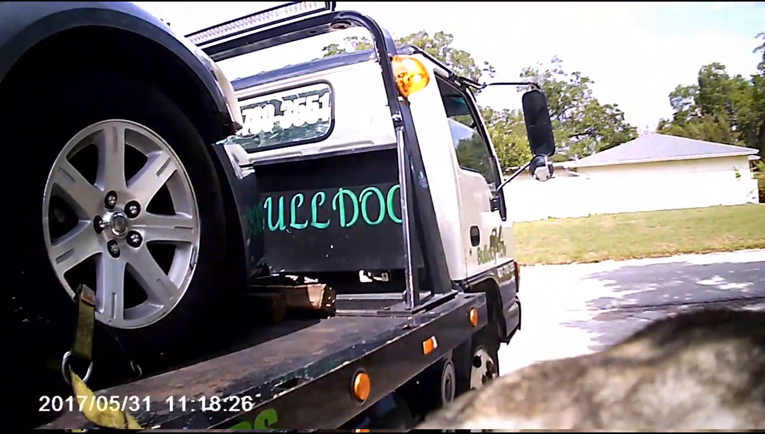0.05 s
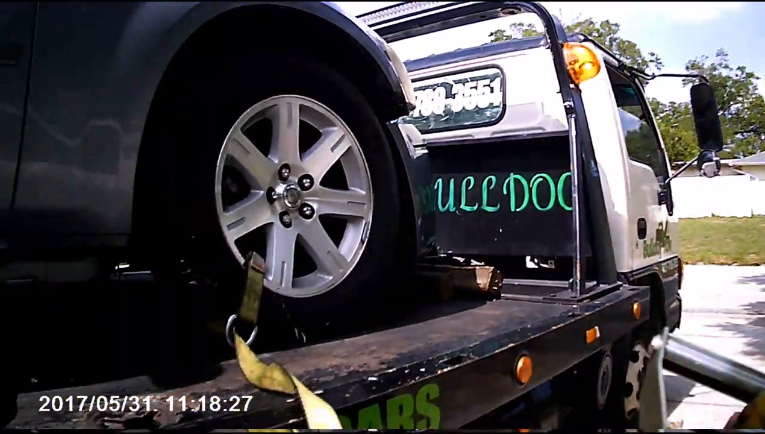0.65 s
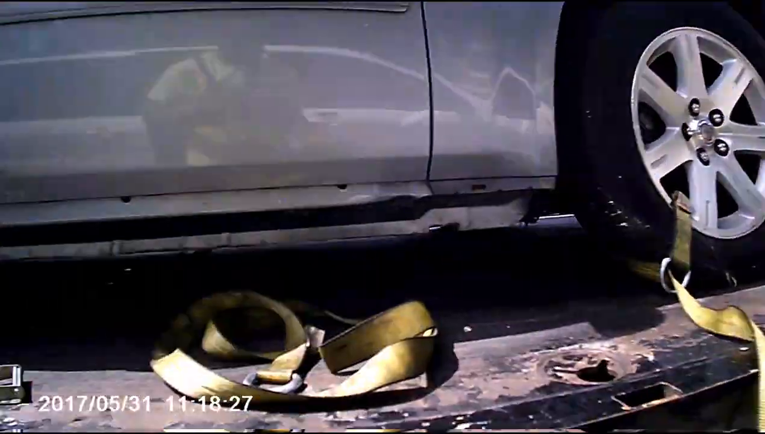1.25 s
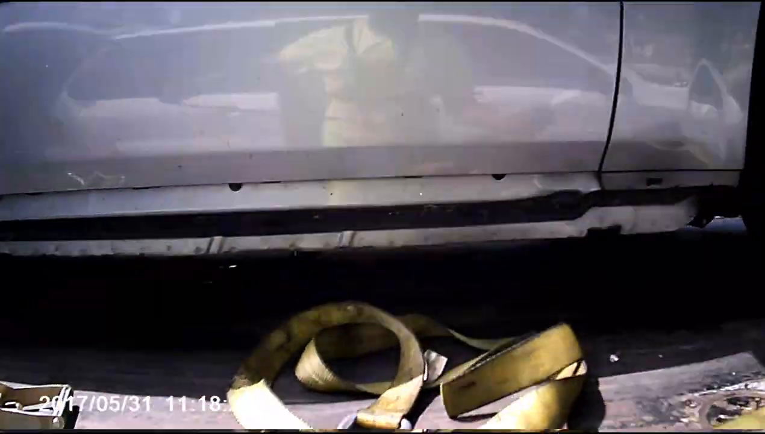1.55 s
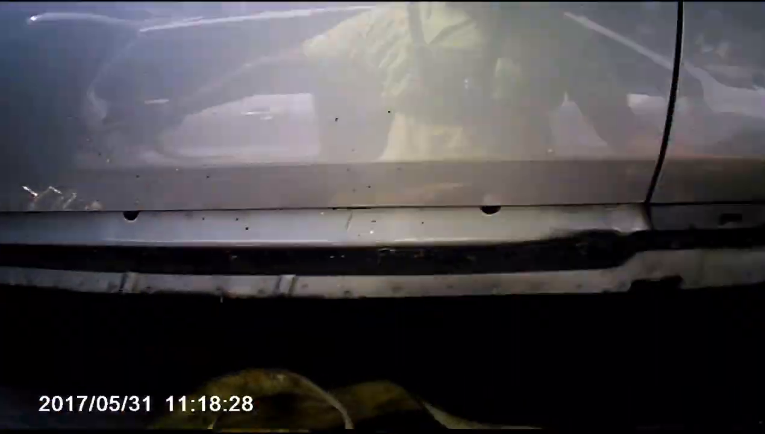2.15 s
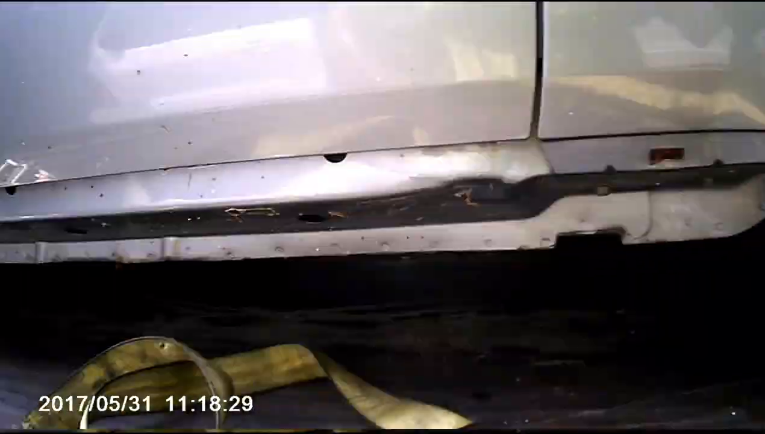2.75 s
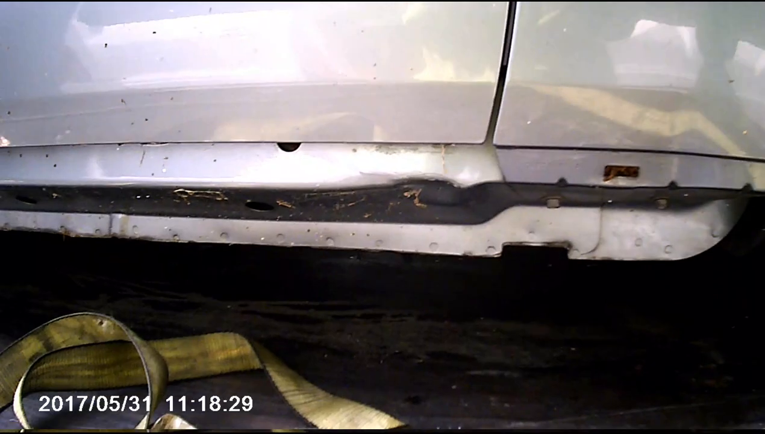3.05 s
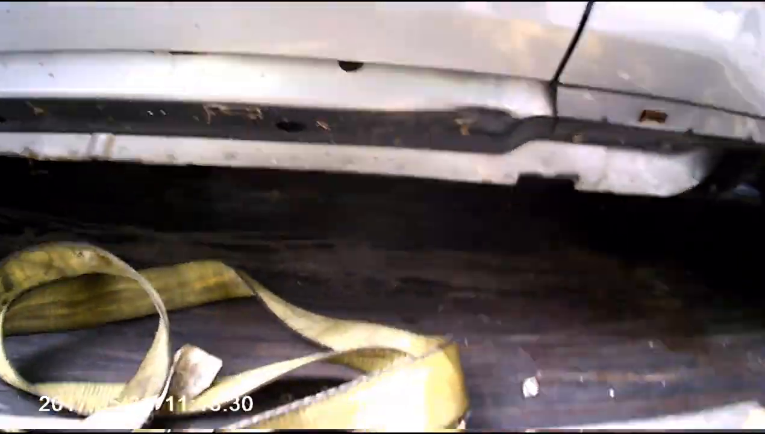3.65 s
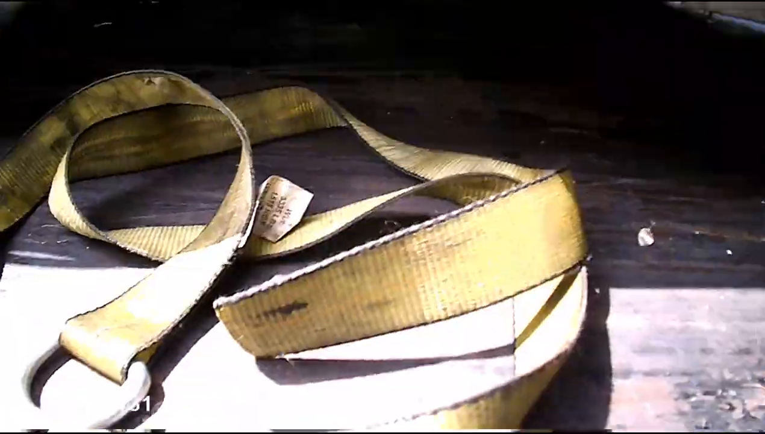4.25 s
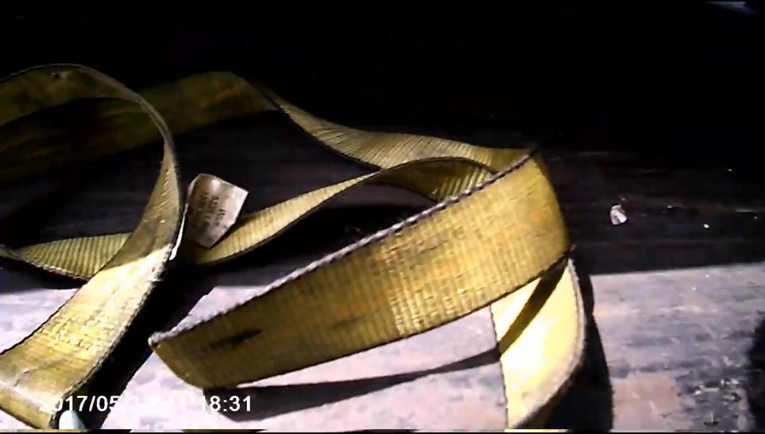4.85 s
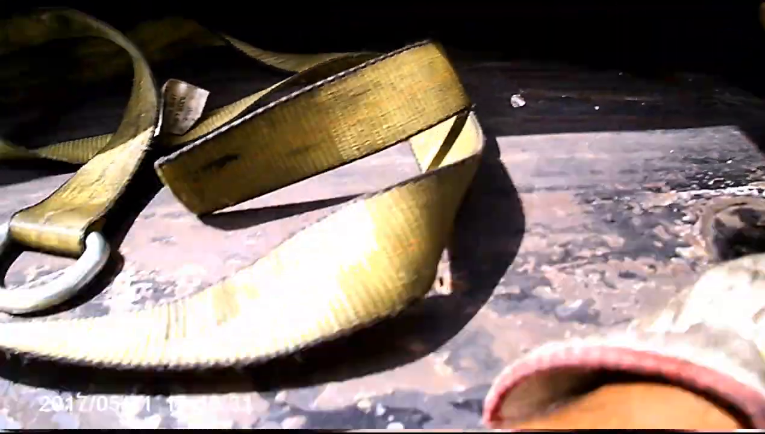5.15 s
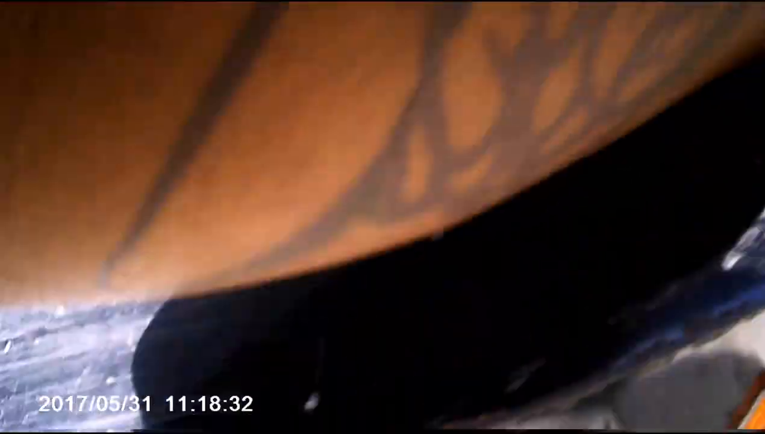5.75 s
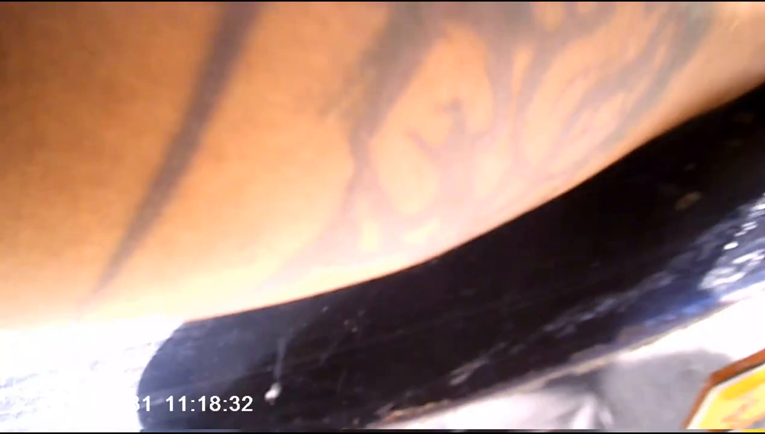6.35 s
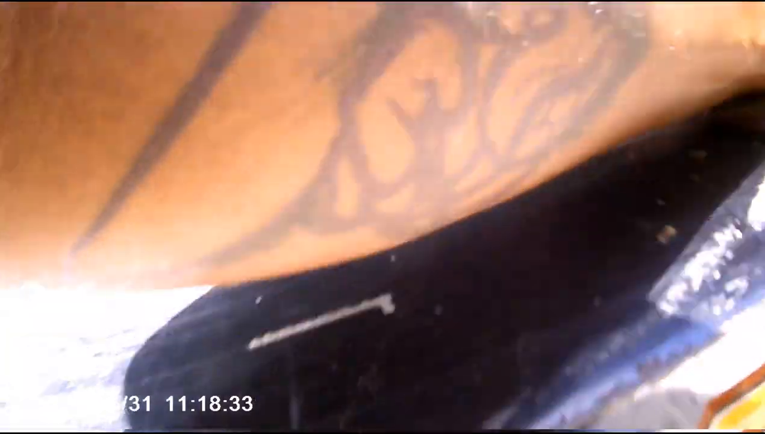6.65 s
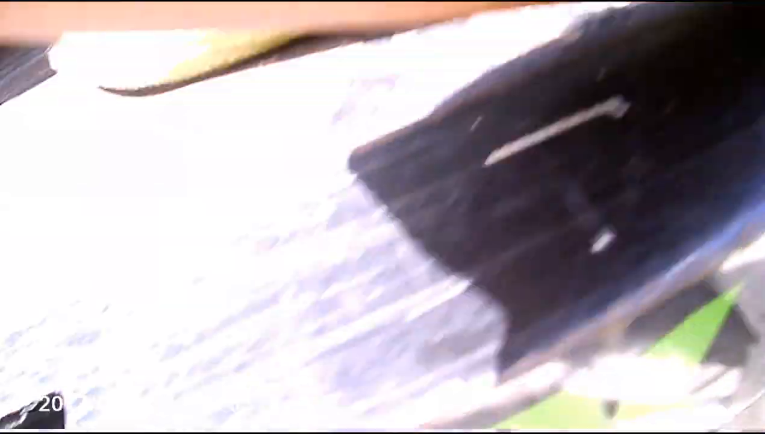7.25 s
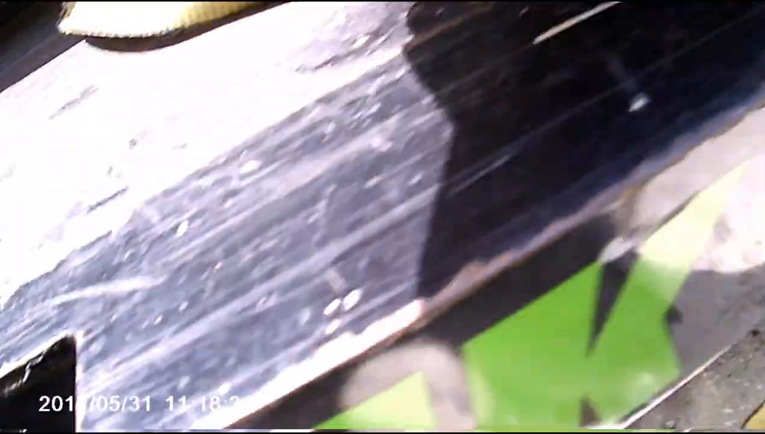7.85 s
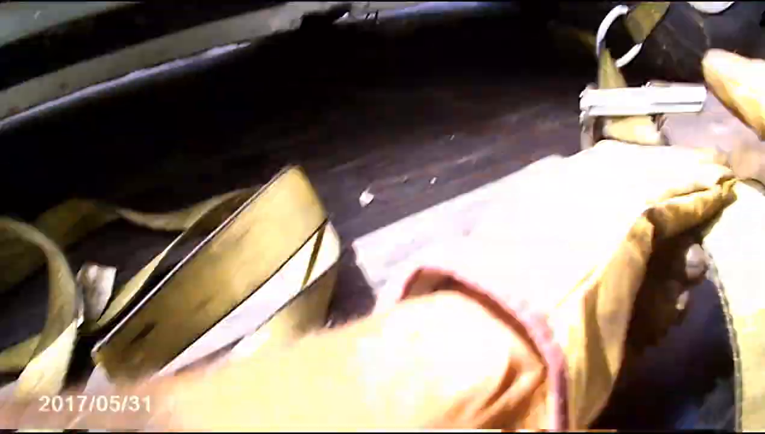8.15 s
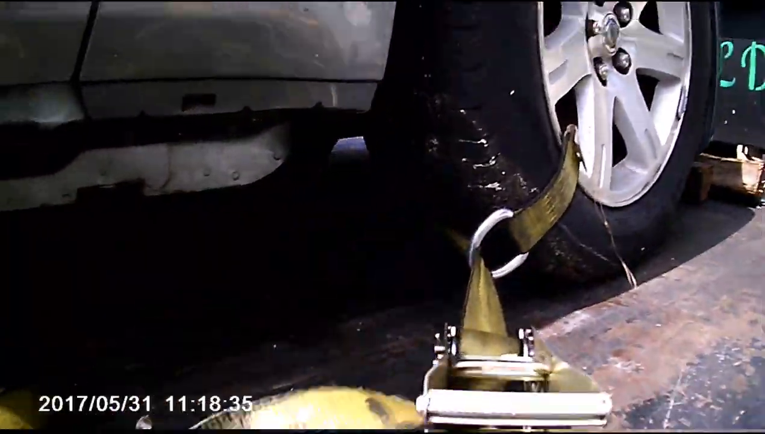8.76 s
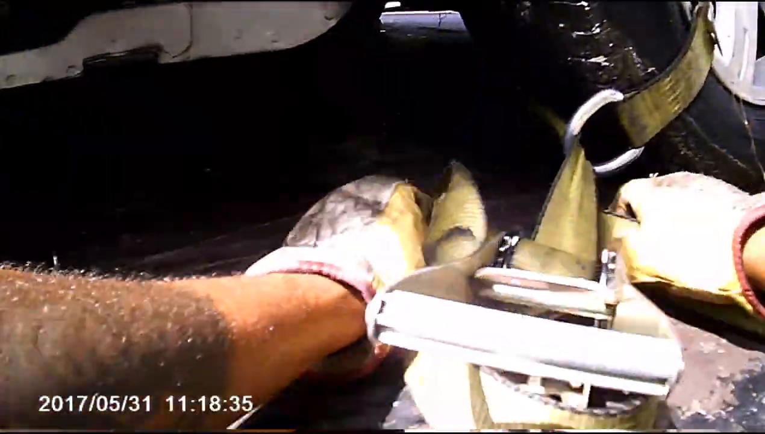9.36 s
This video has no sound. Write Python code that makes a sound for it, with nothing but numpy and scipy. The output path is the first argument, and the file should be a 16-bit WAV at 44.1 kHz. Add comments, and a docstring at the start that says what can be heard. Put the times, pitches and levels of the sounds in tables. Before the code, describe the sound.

A steel tie-down ratchet clicks and clacks as a strap is tightened on a truck bed, over a faint idling diesel engine.

```python
"""A tow truck's diesel idles, its firings pulsing in the exhaust and clatter, with faint squeaks above.
A steel tie-down ratchet is worked on the truck's bed: the handle clacks, the pawl snaps over the teeth
and webbing rustles, all exciting the resonances of the steel. Small parts ring, the strap twangs, and
the buckle twice clunks on the hollow deck among softer thuds. A small body-worn camera hears it all
through its housing, which is knocked and swayed as the wearer moves."""
import sys
import numpy as np
from scipy import signal
from scipy.fft import rfft, irfft, next_fast_len
from scipy.io import wavfile
from scipy.ndimage import uniform_filter1d

SR = 44100
rng = np.random.default_rng(int(sys.argv[2]) if len(sys.argv) > 2 else 0)


def digitize_waveform(pressure):
    """Quantize a signal to 16-bit integers and store it at the path in sys.argv[1].

    Rows of a 2-D input are taken as channels; values are limited to [-1, 1].
    """
    field = np.atleast_2d(pressure).T
    bounded = np.clip(field, -1, 1)
    quanta = np.round(bounded * 32767).astype(np.int16)
    wavfile.write(sys.argv[1], SR, quanta)


N = 422919
TIME = np.arange(N) / SR

# resonances of the ratchet: centre_hz, width_hz, gain_db
STEEL_RESONANCES = [(538, 35, -4.5), (792, 41, -7.5), (1209, 150, -0.5), (1416, 45, 3.5), (1646, 210, -11),
                    (1969, 135, -2.5), (2145, 80, -3), (2950, 130, -8), (3850, 33, -18), (4150, 290, 4.5),
                    (5150, 500, -3), (6100, 300, 1.5), (7450, 150, -7), (8250, 140, -8), (8800, 150, -9),
                    (9450, 300, -5), (11100, 400, -10), (12250, 250, -5), (13120, 150, -3),
                    (13620, 300, -1), (14330, 300, -10), (15270, 130, -3), (15650, 150, -9)]
DIRECT_DB = -10.5   # contact noise that bypasses them
# the loose handle clacks against the frame; the first row is instead the bright snap of the housing knock at
# 1.446 s: start_s, frame_db, edge_db
HANDLE_CLACKS = [(1.444, -52, -68), (2.1688, -48, -55), (2.352, -43, -52), (2.425, -50, -68),
                 (2.5167, -50, -62), (2.5835, -55, -63), (2.601, -42, -53), (2.621, -50, -50),
                 (3.101, -56, -66), (3.264, -63, -62), (3.2834, -61, -61), (3.326, -55, -68),
                 (3.3484, -46.5, -54), (3.5557, -49, -75), (3.739, -56, -69), (3.992, -52, -68),
                 (4.226, -59, -60), (4.280, -56, -63), (4.323, -56, -61), (4.470, -61, -62),
                 (4.536, -62, -71), (4.728, -62, -63), (3.796, -46.5, -60), (4.0386, -55, -62),
                 (4.152, -54, -65), (4.366, -48, -68), (4.389, -50, -63), (4.511, -54, -68),
                 (4.921, -51, -71), (5.343, -62, -68), (5.611, -62, -66), (5.895, -62, -60),
                 (6.172, -57, -63), (6.3041, -63, -68), (6.468, -67, -69), (6.679, -63, -67)]
# the pawl snaps over a tooth, two or three times a stroke: start_s, frame_db, edge_db, sparkle_db
PAWL_SNAPS = [(3.6108, -47, -54, -61), (3.6908, -47.5, -49, -60), (3.8779, -48, -49.5, -50),
              (3.913, -51, -52, -53), (3.9445, -49, -50, -54), (4.0785, -47.5, -48.5, -53),
              (4.1201, -55, -48, -52), (4.1662, -47, -48, -55), (4.2627, -49, -52.5, -52),
              (4.2976, -54, -50.5, -54), (4.3325, -49, -48, -50), (4.4389, -47.5, -48, -52),
              (4.482, -54, -49, -52), (4.5555, -62, -64, -65), (4.5915, -55, -60, -60),
              (4.6261, -45.5, -50, -54), (4.6664, -51, -55, -58), (4.7817, -50, -46, -54),
              (4.8245, -50, -48.5, -52), (4.8801, -47, -50.5, -59), (5.6212, -53, -57.5, -65),
              (5.7181, -53, -59, -63), (5.9456, -52, -51, -55), (6.0717, -48, -57, -71),
              (6.1859, -58, -59, -70), (6.5158, -48.5, -52.5, -58), (6.5744, -53, -49, -50)]


def from_db(db):
    """Decibels to amplitude ratio."""
    return 10 ** (np.asarray(db) / 20)


def rms(x):
    """Root-mean-square amplitude."""
    return np.sqrt(np.mean(x ** 2) + 1e-20)


def level_curve(rows):
    """Linear interpolation of (time_s, level_db) at every sample."""
    return np.interp(TIME, *np.transpose(rows))


def band(x, low_hz, high_hz, order=3):
    """Butterworth band-pass."""
    sections = signal.butter(order, [low_hz, min(high_hz, .45 * SR)], "band", fs=SR, output="sos")
    return signal.sosfilt(sections, x + 1e-18)


def noise(spectrum):
    """Noise of unit rms, shaped by (frequency_hz, density_db) and falling away beyond the ends."""
    hz, db = np.transpose(spectrum)
    f = np.maximum(np.arange(N // 2 + 1) * SR / N, 1)
    skirts = np.minimum(f / hz[0], 1) ** 2 * np.minimum(hz[-1] / f, 1) ** 2
    shape = skirts * from_db(np.interp(np.log(f), np.log(hz), db))
    size = next_fast_len(N, True)
    gain = np.interp(np.arange(size // 2 + 1) * SR / size, f, shape)
    x = irfft(rfft(rng.standard_normal(size)) * gain, size)[:N]
    return x / rms(x)


def drift(rate_hz):
    """Random fluctuation with a spread near 1."""
    return np.interp(TIME * rate_hz, np.arange(8000), rng.standard_normal(8000))


def phase_of(hz):
    """Phase is the integral of frequency."""
    return 2 * np.pi * np.cumsum(hz) / SR


def resonate(x, peaks, direct_db):
    """Forced response of parallel resonators beside a direct path."""
    out = from_db(direct_db) * x
    for hz, width_hz, db in peaks:
        r = np.exp(-np.pi * width_hz / SR)
        feedback = [1, -2 * r * np.cos(2 * np.pi * hz / SR), r * r]
        out += from_db(db) * signal.lfilter(np.array([1, 0, -1]) * (1 - r * r) / 2, feedback, x + 1e-18)
    return out


def ring(force, modes):
    """Modal superposition: an impulse starts a damped sine for each (pitch_hz, gain_db, t60_s)."""
    out = np.zeros(N)
    for hz, db, t60_s in modes:
        r, w = np.exp(-np.log(1000) / (t60_s * SR)), 2 * np.pi * hz / SR
        out += from_db(db) * signal.lfilter([0, np.sin(w)], [1, -2 * r * np.cos(w), r * r], force + 1e-18)
    return out


def taps(rows):
    """One impulse for each (start_s, level_db)."""
    out = np.zeros(N)
    for s, db in rows:
        out[int(s * SR)] = from_db(db)
    return out


def swells(rows, attack_s, release_s):
    """Envelope of rubs (start_s, length_s, level_db): being incoherent, they add in power."""
    power = np.zeros(N)
    for s, length_s, db in rows:
        outside = np.maximum(s - TIME, 0) / attack_s + np.maximum(TIME - s - length_s, 0) / release_s
        power += from_db(db) ** 2 * np.exp(-2 * np.minimum(outside, 20))
    return np.sqrt(power)


def bursts(times, levels, rise_s, decay_s):
    """Envelope of impacts: a faint slide, a rise, then exponential decay with a weak rattling tail."""
    t, out = np.arange(-SR // 20, SR // 4) / SR, np.zeros(N)
    after = np.maximum(t - rise_s, 0)
    decay = np.exp(-after / decay_s) + from_db(-27) * np.exp(-after / .022)
    slide = from_db(-19) * np.exp(-((t + .006) / .005) ** 2)
    shape = slide + np.clip(t / rise_s, 0, 1) ** .9 * decay
    for s, db in zip(times, levels):
        start = int((s + t[0]) * SR)
        out[start:start + len(t)] += from_db(db) * shape
    return out


def diesel_idle():
    """Periodic firing gives exhaust harmonics and modulates the clatter, puffs and valve ticks."""
    # exhaust tones: multiple of the firing rate, rms_db
    harmonics = [(1, -66), (2, -65), (3, -82), (4, -84), (14, -88), (18, -87.5), (22, -91)]
    # spectrum of the clatter: frequency_hz, density_db
    clatter_spectrum = [(71, -62), (120, -18), (281, -2.5), (316, -5), (468, -1.5), (604, -9), (754, -3.5),
                        (1390, -3), (1510, -6.5), (2090, -5), (2610, -26.5), (3030, -8.5), (3540, -28.5),
                        (4130, -16), (7000, -26), (9100, -60), (15400, -120)]
    # air resonances of the microphone port: centre_hz, width_hz, gain_db
    port_resonances = [(442, 83, -4), (1150, 230, 3.5), (1412, 45, 4.5), (2020, 810, 1), (3190, 660, -17),
                       (4300, 110, -5), (6230, 500, 2.5)]
    # midrange clatter as the wearer turns: time_s, level_db
    clatter_levels = [(0, -65), (1.3, -64), (1.75, -68), (3.1, -70.5), (4.2, -73), (5.2, -68.5), (6.3, -69),
                      (7.0, -71.5), (7.7, -67.5), (8.5, -68.5), (9.59, -71)]
    firing_hz, surge_hz = 25.06, 21
    phase = phase_of(firing_hz * (1 + .002 * drift(3)))
    tones = sum(np.sqrt(2) * from_db(db) * np.sin(k * phase + rng.uniform(0, 2 * np.pi))
                for k, db in harmonics)
    clatter = resonate(noise(clatter_spectrum), port_resonances, direct_db=-1.5)
    clatter *= from_db(1.3 * np.sin(phase) + drift(40))
    clatter *= from_db(level_curve(clatter_levels) + .5) / rms(band(clatter, 660, 2400))
    # four ticks for each firing, their strengths repeating with the camshaft
    tick = 4 * phase / (2 * np.pi)
    strikes = np.exp(-2.2 * (tick % 1)) * from_db(rng.uniform(-4, 4, 16))[tick.astype(int) % 16]
    valves = band(rng.standard_normal(N) * strikes, 3930, 4220, order=2)
    valves *= from_db(3 * np.sin(phase_of(surge_hz * (1 + .06 * drift(10)))))
    puffs = noise([(55, 0), (100, -2), (140, -13), (260, -16)]) * from_db(6 * np.sin(phase))
    return tones + clatter + from_db(-77) * puffs / rms(puffs) + from_db(-80) * valves / rms(valves)


def body_movement():
    """Sway, bumps, cloth friction and buffets of air put low-frequency pressure on the microphone."""
    # how much the wearer moves: time_s, level_db
    motion_levels = [(0.15, -59), (0.22, -62), (1.99, -50), (2.17, -59), (2.69, -43), (2.77, -54),
                     (3.23, -60), (3.6, -53), (3.95, -44), (4.38, -44), (4.52, -51), (4.75, -45),
                     (5.2, -47), (5.9, -42), (6.16, -43), (6.4, -46), (6.75, -47), (6.95, -52), (8.68, -53),
                     (8.76, -45), (8.95, -58), (9.45, -59)]
    # soft bumps of the camera against clothing: start_s, thump_db, rub_db
    bumps = [(1.325, -62, -69), (1.375, -55, -64), (1.446, -42.5, -59), (1.477, -54, -65),
             (2.545, -46.5, -72), (2.572, -46, -66), (2.638, -33, -59), (4.343, -44, -66),
             (4.500, -50, -61), (4.825, -47, -72), (5.620, -43, -73), (5.665, -44.5, -75),
             (5.789, -42, -72), (5.887, -42, -72), (6.125, -52, -75), (6.646, -47, -72), (7.27, -56, -74),
             (7.65, -59, -74), (8.300, -57, -65), (8.465, -63, -71), (8.545, -62, -67), (8.753, -43, -71),
             (9.12, -61, -73)]
    motion = from_db(level_curve(motion_levels))
    force = taps([(s, db) for s, db, _ in bumps])
    thumps = band(ring(force, [(23.6, 10, .053), (62, 5, .022), (125, 1, .013)]), 14, 310, order=2)
    sway = from_db(11) * motion * noise([(5, 1.5), (8, 1.5), (13, -8), (20, -10.5), (35, -31), (70, -43)])
    bump_drag = swells([(s, 0, db) for s, _, db in bumps], attack_s=.09, release_s=.045)
    rub = np.hypot(from_db(-31) * motion, bump_drag) * noise([(50, -5), (100, -5), (210, -7), (280, -14)])
    buffets = noise([(25, 0), (45, -3), (90, -14), (130, -26)]) * from_db(4 * drift(14))
    return thumps + sway + rub + from_db(-19) * motion * buffets


def squeaks():
    """Random frequency modulation makes thin tones and their octaves waver, barely above the idle."""
    # faint chirps: start_s, length_s, pitch_hz, level_db, octave_db
    chirps = [(.88, 0.14, 5130, -75.5, -5), (1.137, .014, 4250, -63, -20), (1.383, .03, 2090, -60, -18),
              (8.06, 0.076, 5080, -75, -5), (8.15, 0.067, 5080, -76, -5), (8.53, .1, 1770, -70, -20)]
    out = np.zeros(N)
    for s, length_s, hz, db, octave_db in chirps:
        phase = phase_of(hz * (1 + .047 * drift(620)))
        envelope = from_db(db) * np.sin(np.pi * np.clip((TIME - s) / length_s, 0, 1))
        out += envelope * (np.sin(phase) + from_db(octave_db) * np.sin(2 * phase))
    return out


def chatter(times, levels, bands):
    """Steel meets steel in many tiny impacts, so the force of each contact is a burst of noise."""
    force = np.zeros(N)
    for low_hz, high_hz, delay_s, rise_s, decay_s, gain_db in bands:
        grit = band(rng.standard_normal(N) * from_db(2.5 * drift(700)), low_hz, high_hz)
        grit /= np.sqrt(uniform_filter1d(grit ** 2, size=220) + 1e-18)   # each snap keeps an even energy
        grit /= rms(resonate(grit[:SR // 2], STEEL_RESONANCES, DIRECT_DB))
        force += grit * bursts(times + delay_s, levels + gain_db, rise_s, decay_s)
    return force


def ratchet_contacts():
    """Impact excitation: the handle clacks dully, the pawl snaps brightly, the frame answers both."""
    # contact bands of each part: low_hz, high_hz, delay_s, rise_s, decay_s, gain_db
    handle_bands = [(2300, 4400, -.002, .003, .0065, 1.2), (6600, 12500, -.002, .003, .006, -5)]
    frame_band = (560, 2550, -.003, .0055, .015, -.3)
    pawl_bands = [(2850, 7000, -.0017, .0035, .0055, 1.8), (6300, 12500, -.0015, .003, .0045, 1)]
    sparkle_band = (12200, 15900, -.0015, .0032, .0045, 3)
    snap_s, snap_frame_db, snap_db, sparkle_db = np.transpose(PAWL_SNAPS)
    clack_s, clack_frame_db, clack_db = np.transpose(HANDLE_CLACKS)
    frame = chatter(np.r_[snap_s, clack_s], np.r_[snap_frame_db, clack_frame_db], [frame_band])
    first_touches = from_db(17) * band(taps(zip(clack_s, clack_db)), 1800, 5500, order=2)
    pawl = chatter(snap_s, snap_db, pawl_bands) + chatter(snap_s, sparkle_db, [sparkle_band])
    handle = chatter(clack_s, clack_db, handle_bands) + first_touches
    return handle + pawl + frame


def steel_body(force):
    """Resonance under shifting grip and load: each contact finds the peaks retuned and reweighted."""
    detune, grip_db = .01, 3
    starts = [0] + sorted(int(row[0] * SR) - SR // 100 for row in PAWL_SNAPS + HANDLE_CLACKS)
    out = np.zeros(N)
    for start, end in zip(starts, starts[1:] + [N]):
        piece = np.pad(force[start:end], (0, SR // 10))[:N - start]
        peaks = [(hz * (1 + detune * rng.uniform(-1, 1)), width_hz, db + grip_db * rng.uniform(-1, 1))
                 for hz, width_hz, db in STEEL_RESONANCES]
        out[start:start + len(piece)] += resonate(piece, peaks, DIRECT_DB)
    return out


def housing_knocks():
    """Heavily damped plastic modes give dry snaps; the case catches twice at each knock."""
    # sharp knocks on the camera housing: start_s, level_db, pitch_ratio, top_hz
    knocks = [(1.4455, -34.5, .99, 2700), (2.3055, -31, .98, 2700), (2.637, -33, 1, 2500),
              (5.8473, -27.5, 1.02, 3500), (6.6465, -27.5, .99, 2700)]
    # modes of the housing: pitch_hz, gain_db, t60_s
    housing_modes = [(272, -10, 0.034), (635, -9.5, 0.015), (830, -13, .025), (1220, -10.5, 0.034),
                     (1420, -5.5, 0.021), (1703, -2, 0.015), (2120, -7.5, 0.024), (2930, -5.5, 0.013),
                     (4080, -12, 0.013)]
    catch_s, catch_db = .0021, -11
    out = np.zeros(N)
    for s, db, pitch_ratio, top_hz in knocks:
        force = taps([(s, db), (s + catch_s * rng.uniform(.8, 1.2), db + catch_db)])
        modes = [(hz * pitch_ratio, gain_db, t60_s) for hz, gain_db, t60_s in housing_modes]
        out += band(ring(force, modes), 63, top_hz, order=4)
    return out


def webbing_friction():
    """Stick-slip friction: the weave drags over the spool in small catches at each pull and stroke."""
    # webbing pulled through the buckle by hand: start_s, length_s, level_db
    pulls = [(2.36, .14, -70), (2.58, .04, -60), (3.35, .04, -68), (3.97, .04, -63), (5.88, .05, -63),
             (6.43, .04, -71), (8.53, .06, -66.5), (9.10, .03, -71)]
    wind_db, usual_snap_db = -69, -50
    # a harder snap goes with louder winding
    winding = [(s, 0, wind_db + .3 * (edge_db - usual_snap_db)) for s, _, edge_db, _ in PAWL_SNAPS]
    catches = from_db(4.5 * drift(110))
    drag = noise([(250, 1.5), (700, 7), (1400, 0), (4000, -9.5), (9000, -18.5), (15000, -24)]) * catches
    envelope = swells(winding + pulls, attack_s=.04, release_s=.06)
    return envelope * drag / rms(resonate(drag[:2 * SR], STEEL_RESONANCES, DIRECT_DB))


def deck_clunks():
    """The rattling buckle drives the deck's modes; padded by webbing, most landings stay dull, while the
    hardest ring the upper modes too."""
    # the buckle lands or thuds on the deck: start_s, level_db, low_hz, top_hz
    clunks = [(3.614, -52, 230, 900), (3.696, -48, 170, 420), (3.798, -45.5, 240, 620),
              (3.880, -52, 180, 500), (3.948, -39, 300, 2400), (3.954, -37.5, 230, 720),
              (4.082, -53, 170, 400), (4.122, -53, 170, 400), (4.167, -55, 180, 500),
              (4.265, -50, 180, 500), (4.336, -36, 380, 2600), (4.338, -37, 160, 720),
              (4.391, -53, 300, 1200), (4.512, -51, 500, 900), (4.632, -52.5, 250, 800),
              (4.669, -50, 195, 620), (4.884, -55, 200, 600), (4.922, -54, 200, 704),
              (5.625, -54.5, 220, 620)]
    # modes of the deck: pitch_hz, gain_db, t60_s
    deck_modes = [(207, -13, 0.13), (225, -12, 0.11), (271, -8.5, 0.12), (350, -6.5, .12),
                  (438, -11.5, 0.09), (510, -8.5, 0.11), (613, -7, 0.054), (695, -9, 0.08), (760, -8, 0.1),
                  (945, -11, 0.07), (1222, -1, 0.11), (1410, -1, .085), (1470, -5, 0.034), (1660, -8, .06),
                  (1975, -4, .06), (2110, -7, 0.04), (2920, -10, 0.04), (4140, 0, 0.037)]
    impact_s, settle_s, settle_db = .017, .055, -26
    t, force = np.arange(SR // 4) / SR, np.zeros(N)
    decay = np.exp(-(t / impact_s) ** 2) + from_db(settle_db) * np.exp(-t / settle_s)
    envelope = np.minimum(t / .002, 1) * decay
    for s, db, low_hz, top_hz in clunks:
        rattle = band(rng.standard_normal(len(t)), low_hz, top_hz)
        rattle *= rms(rattle) / np.sqrt(uniform_filter1d(rattle ** 2, size=700) + 1e-18)
        force[int(s * SR):int(s * SR) + len(t)] += from_db(db) * rattle * envelope
    hollow = band(force, 200, 900, order=5)   # dense low ring of the space under the deck
    return from_db(-27.5) * ring(force, deck_modes) + hollow


def strap_twangs():
    """A string's pitch follows its tension: the jolted strap starts sharp and sinks as it slackens."""
    # jolts of the strap: start_s, level_db, slack_pitch_hz
    twangs = [(3.822, -56, 205), (3.975, -50, 225), (4.364, -48.5, 205), (4.428, -59, 160),
              (4.700, -60, 210)]
    peak_s, sag_s = .015, .03
    t, out = np.arange(SR // 4) / SR, np.zeros(N)
    swell = (t / peak_s) ** 2 * np.exp(2 - 2 * t / peak_s)
    pitch_ratio = 1 + .5 * np.exp(-t / sag_s)
    for s, db, slack_hz in twangs:
        tone = np.sin(phase_of(slack_hz * pitch_ratio))
        out[int(s * SR):int(s * SR) + len(t)] += from_db(db) * swell * tone
    return out


def jingle():
    """Free vibration of the spring, the pawl and the strap's ring, struck once and on the rebound."""
    # clicks that set small steel parts ringing: start_s, spring_db, pawl_db, strap_ring_db
    pings = [(3.943, -54, -58, -70), (4.124, -68, -52, -70), (4.167, -68, -49, -70), (4.441, -64, -57, -70),
             (4.784, -66, -54, -70), (4.2632, -53, -62, -50), (4.2996, -56, -60, -51),
             (4.3335, -44.5, -55, -52), (4.342, -50, -58, -60), (4.5915, -58, -70, -66),
             (4.6678, -53, -62, -59), (5.624, -66, -66, -62), (5.7194, -61, -68, -64),
             (5.947, -66, -50, -70), (6.1884, -70, -68, -60), (6.578, -58, -54, -70)]
    # modes of each part: pitch_hz, gain_db, t60_s
    spring_modes = [(4183, -9, 0.085), (8226, -8, 0.042), (12160, -10, .03), (13075, 1, 0.055),
                    (13150, -6, .06), (13245, -3, 0.055)]
    pawl_modes = [(5030, -8, .03), (6080, 0, .075), (6370, -6, .05), (13660, -10, .04)]
    strap_ring_modes = [(4134, -9, .15), (8370, -7, .085), (15260, -1, .042)]
    rebound_s, rebound_db = .004, -6
    out = np.zeros(N)
    for column, modes in enumerate([spring_modes, pawl_modes, strap_ring_modes], start=1):
        hits = [(row[0], row[column]) for row in pings]
        for mode in modes:
            rebounds = [(s + rebound_s * rng.uniform(.5, 1.5), db + rebound_db) for s, db in hits]
            out += ring(taps(hits + rebounds), [mode])
    return out


def scene():
    """Superposition at the wearer's chest; contacts and webbing sound through the same steel."""
    tie_down = steel_body(ratchet_contacts() + webbing_friction()) + jingle()
    tie_down += deck_clunks() + strap_twangs()
    return (tie_down + housing_knocks() + body_movement() + diesel_idle() + squeaks())[None]


def record(dry):
    """Electronic self-noise adds hiss and a thin whine; the top is cut and a steady offset added."""
    # spectrum of the hiss: frequency_hz, density_db
    hiss_spectrum = [(30, 15), (80, 11), (150, 7), (400, 9), (3000, 1.5), (7000, -0.5), (10000, -1.5),
                     (14000, -2), (16000, -14)]
    whine_hz, cutoff_hz, offset = 9120, 16000, -.0379
    hiss = from_db(-71.5) * noise(hiss_spectrum)
    whine = band(rng.standard_normal(N), whine_hz - 55, whine_hz + 55, order=2)
    sound = dry + hiss + from_db(-87.5) * whine / rms(whine)
    low_pass = signal.ellip(10, .2, 70, cutoff_hz, fs=SR, output="sos")
    return signal.sosfilt(low_pass, sound) + offset


dry = scene()
out = record(dry)
digitize_waveform(out)
```